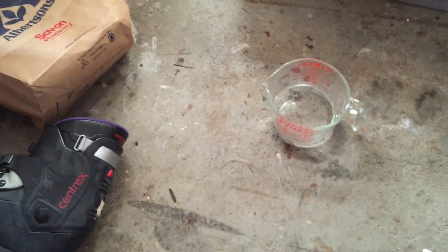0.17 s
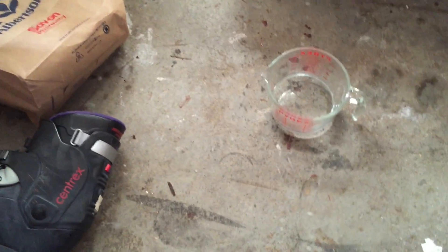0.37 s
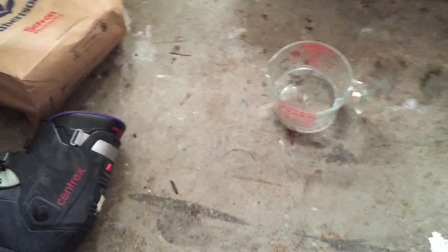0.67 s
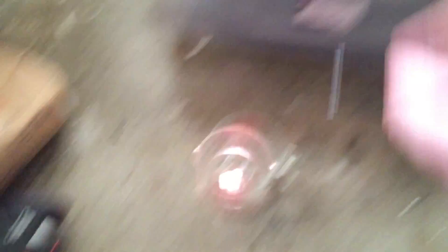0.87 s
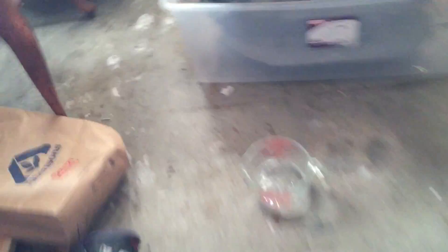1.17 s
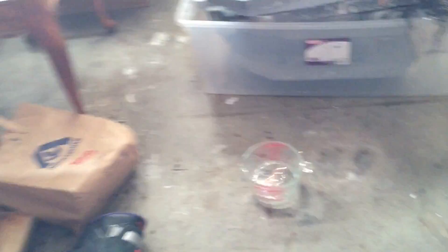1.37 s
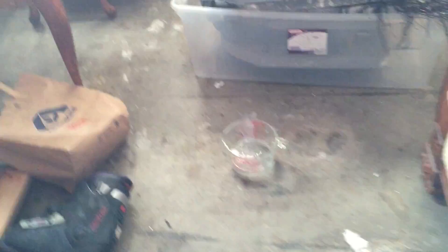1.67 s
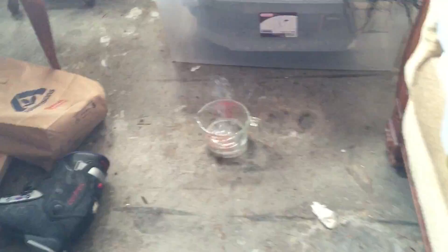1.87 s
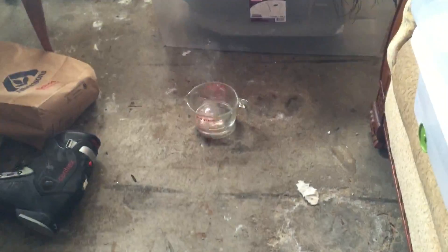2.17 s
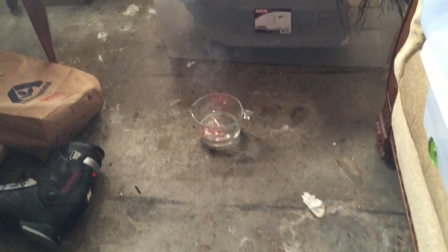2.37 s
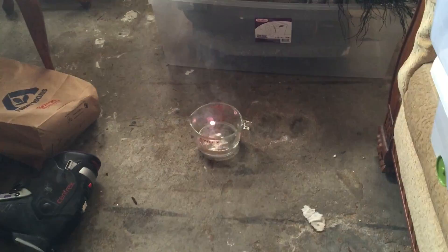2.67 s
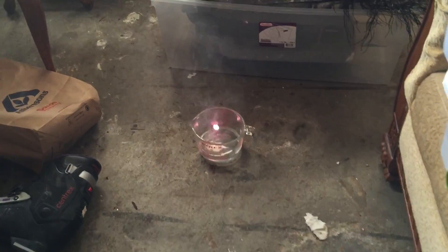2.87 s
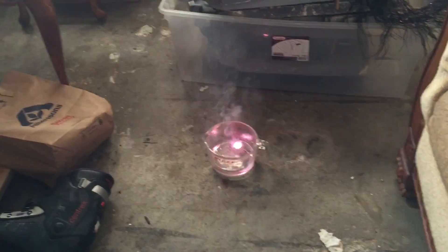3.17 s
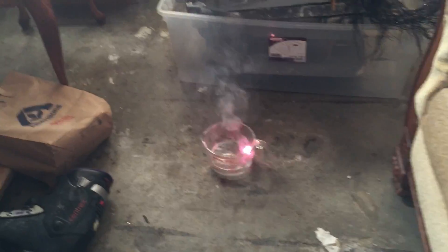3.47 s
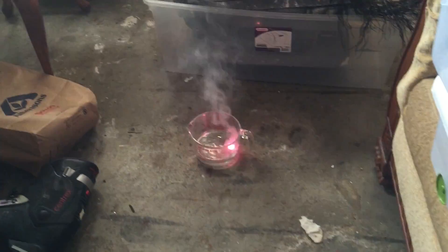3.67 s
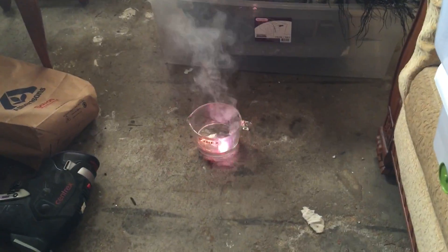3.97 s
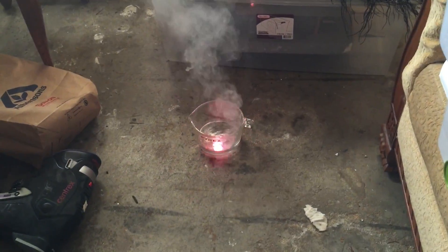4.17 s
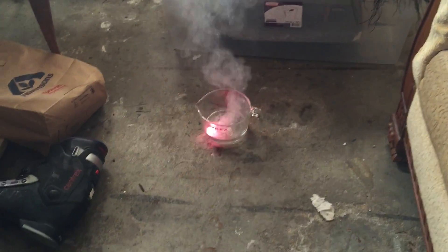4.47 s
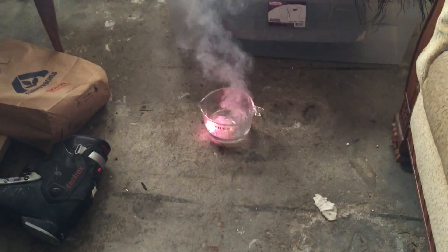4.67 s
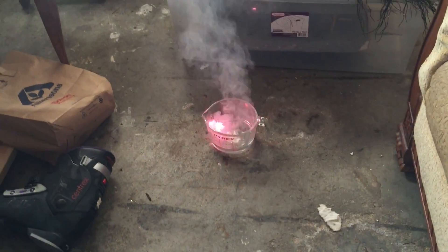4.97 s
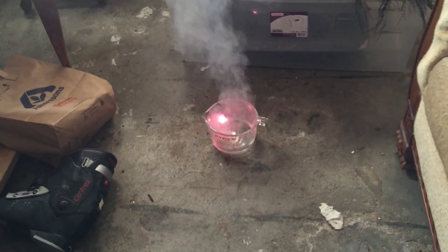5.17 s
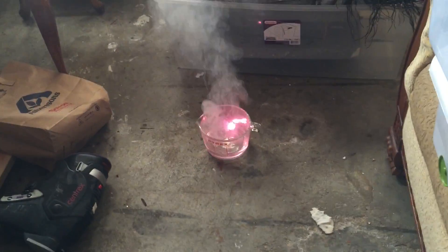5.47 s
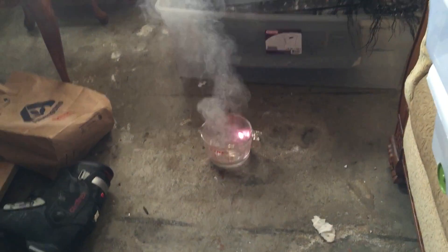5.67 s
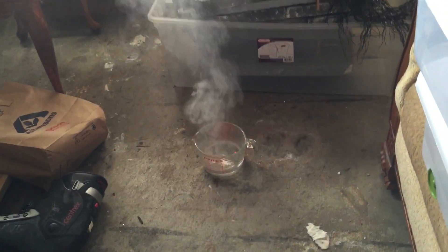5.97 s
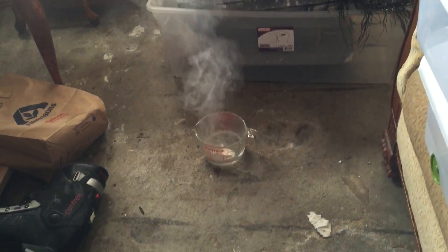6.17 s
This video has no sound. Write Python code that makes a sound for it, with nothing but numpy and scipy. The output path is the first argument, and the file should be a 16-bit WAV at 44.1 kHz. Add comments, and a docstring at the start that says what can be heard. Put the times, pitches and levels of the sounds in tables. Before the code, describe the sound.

A lump of reactive metal slaps into water in a glass cup, plops, fizzes and pops, hisses faintly, then ends in one violent blast.

```python
"""Reactive metal in a glass cup of water

A lump of reactive metal strikes water in a glass cup indoors: two filtered-noise blows with late rings,
a plop of rising pitch, pops of short noise puffs, random crackling ticks, fizz, jets of hissing gas,
and a last blast of noise and two low tones. The cup's resonances and a decaying noise tail for the room
colour them. Soles drag over concrete, cloth rustles, and an appliance hums in quiet air."""
import sys
import numpy as np
from scipy import signal
from scipy.fft import rfft, irfft, next_fast_len
from scipy.io import wavfile
from scipy.ndimage import uniform_filter1d, map_coordinates

SR = 44100
rng = np.random.default_rng(int(sys.argv[2]) if len(sys.argv) > 2 else 0)


def put_to_file(sound):
    """Save the sound as 16-bit audio at rate SR, in the file named by the first command-line argument."""
    columns = np.atleast_2d(sound).T  # one column per channel
    safe = np.clip(columns, -1, 1)
    whole_steps = np.round(safe * 32767)
    wavfile.write(sys.argv[1], SR, whole_steps.astype(np.int16))


N = 278712


def amp(db):
    """Gain of a level in dB."""
    return 10 ** (np.asarray(db) / 20)


def unit(x):
    """x at rms 1."""
    return x / np.sqrt(np.mean(x ** 2) + 1e-20)


def peak(x):
    """x at peak 1."""
    return x / np.abs(x).max()


def along(points, hz):
    """(Hz, value) points interpolated on a log frequency axis."""
    f, v = np.transpose(points)
    return np.interp(np.log(hz + 1), np.log(f + 1), v)


def curves(rows):
    """One value per sample for each column after the time; -120 outside the rows."""
    s, *cols = np.transpose(rows)
    return [np.interp(np.arange(N) / SR, s, c, -120, -120) for c in cols]


def wobble(knots_per_s):
    """A smooth random curve through normally distributed knots."""
    knots = rng.standard_normal(int(N * knots_per_s / SR) + 4)
    return map_coordinates(knots, [np.arange(N) * knots_per_s / SR])


def filtered(x, response):
    """x times a complex response of frequency."""
    m = next_fast_len(len(x) + 8192)
    return irfft(rfft(x, m) * response(np.fft.rfftfreq(m, 1 / SR)), m)[:len(x)]


def band(x, lo_hz, hi_hz):
    """Causal band-pass."""
    edges_hz = np.clip([lo_hz, hi_hz], 20, .49 * SR)
    return signal.sosfilt(signal.butter(3, edges_hz, "bandpass", fs=SR, output="sos"), x)


def rush(spectrum, patchy_db):
    """Noise of rms 1 shaped by a spectrum, with time-frequency patches of random gain."""
    z = signal.stft(rng.standard_normal(N), nperseg=256)[2]
    field = uniform_filter1d(rng.standard_normal(z.shape), 5, 0)
    field = uniform_filter1d(field, 12, 1)
    white = signal.istft(z * amp(patchy_db * unit(field)), nperseg=256)[1][:N]
    return unit(filtered(white, lambda hz: amp(along(spectrum, hz))))


def gust(start_s, length_s, db, shape):
    """Gain of a stretch of sound: a rise, a slow sag, a fall past its length."""
    rise_s, sag_db, fall_s = shape
    rise_s = min(rise_s, .4 * length_s)
    t = np.arange(N) / SR - start_s
    sagged = np.clip((t - rise_s) / (length_s - rise_s), 0, 1)
    fallen_db = 20 * np.maximum(t - length_s, 0) / fall_s
    return np.clip(t / rise_s, 0, 1) * amp(db - sag_db * sagged - fallen_db)


# Cup resonances, two of the air column, then the glass. Each row: centre in Hz, width in Hz, gain in dB.
CUP_MODES = [(881, 130, 2.5), (1204, 190, -4.5), (1805, 85, 5.5), (2710, 170, -1.5), (3550, 220, -2)]


def cup(hz, modes=CUP_MODES):
    """The cup's resonances over a broad direct path, dull above a few kHz."""
    rings = 0
    for k, (centre_hz, width_hz, db) in enumerate(modes):
        damping = 1j * hz * width_hz
        rings = rings + (-1) ** k * amp(db) * damping / (centre_hz ** 2 - hz * hz + damping)
    direct = amp(-18) * 1j * hz * 2500 / (1500 ** 2 - hz * hz + 1j * hz * 2500)
    return (rings + direct) / (1 + 1j * hz / 4200) ** 3


# Sound bouncing between water and rim: spacing of the peaks in Hz, share returned.
WATER_RIM_BOUNCE = (1810, .22)


def bounce(hz):
    """Repeated short echoes inside the cup comb the spectrum."""
    spacing_hz, share = WATER_RIM_BOUNCE
    return 1 / (1 - np.clip(share, 0, .8) * np.exp(-2j * np.pi * hz / spacing_hz))


# Room decay. Each row: frequency in Hz, t60 in seconds.
ROOM_T60 = [(100, 0.3), (700, 0.19), (2000, 0.15), (5000, .16), (12000, 0.1)]


def echo(x):
    """The room's answer: each frequency dies at its own speed; a new tail for each call."""
    hz, t, z = signal.stft(rng.standard_normal(SR // 3), SR, nperseg=256)
    decay = amp(-60 * t / along(ROOM_T60, hz)[:, None])
    tail = signal.istft(z * decay, SR, nperseg=256)[1]
    delayed = np.pad(x, (260, 0))
    return signal.fftconvolve(delayed, tail / np.linalg.norm(tail))


# Air noise spectrum. Each row: frequency in Hz, relative density in dB.
AIR_SPECTRUM = [(13, -55), (22, -27.5), (40, -14), (118, -10.5), (200, -22.5), (242, -13.5), (270, -17.5),
                (510, -28.5), (792, -28.5), (1340, -31), (1760, -31.5), (6620, -38), (16000, -44)]
AIR_RMS_DB = -66.5
# Appliance hum. Each row: frequency in Hz, mean peak level in dB.
HUM_TONES = [(118, -74), (239, -77)]


def room_tone():
    """Quiet air noise and hum tones wavering in level and phase."""
    t = np.arange(N) / SR
    hum = 0
    for hz, db in HUM_TONES:
        hum = hum + amp(db + 3.5 * wobble(8)) * np.sin(2 * np.pi * hz * t + 1.5 * wobble(5.3))
    return amp(AIR_RMS_DB + .8 * wobble(3.8)) * rush(AIR_SPECTRUM, patchy_db=1.0) + hum


# Gas hiss spectrum. Each row: frequency in Hz, relative density in dB.
HISS_SPECTRUM = [(880, -27), (1500, -11), (1830, 0), (2510, -11), (3410, -1.5), (4830, -9), (7170, -7),
                 (10500, -12), (13800, -6), (16000, -13.5)]
# Gas jets. Each row: start in seconds, length in seconds, level in dB ahead of the cup, emphasis in Hz.
GAS_JETS = [(.788, .027, -38, 3800), (3.895, .04, -59, 7500), (3.95, .045, -43.5, 9500),
            (3.99, .14, -41, 5800), (4.266, .03, -58, 13000), (4.392, .052, -39.5, 8800),
            (4.46, .07, -54, 6430), (4.613, .067, -58, 10100), (4.69, .048, -44.5, 7500),
            (4.742, .105, -43.5, 7300), (4.848, .06, -44.5, 8800), (6.266, .003, -53, 10500)]
# Rise in seconds (at most 40% of the length), sag over the rest in dB, fall in seconds per 20 dB.
JET_ENVELOPE = (.024, 6.5, .022)


def jets():
    """Burning gas escapes in fluttering jets, each with its own broad emphasis."""
    gas = amp(1.4 * wobble(70) + 1.4 * wobble(300)) * rush(HISS_SPECTRUM, patchy_db=2.5)
    out = np.zeros(N)
    for start_s, length_s, db, centre_hz in GAS_JETS:
        tone = unit(filtered(gas, lambda hz: 1 / (1 + .42 * np.log2((hz + 1) / centre_hz) ** 2)))
        out += gust(start_s, length_s, db, JET_ENVELOPE) * tone
    return amp(-1.5) * filtered(out, bounce) + amp(-1.1) * filtered(out, cup)


# The lump striking the water, then the first flash. Each row: start in seconds, slap level in dB,
# slap t60 in seconds, tail level in dB relative to the slap, tail t60 in seconds.
BIG_BLOWS = [(.8128, -11, 0.028, -17, .22), (.9875, -9.5, 0.049, -17, .2)]
# Spectra of the strike and of the flash. Each row: frequency in Hz, relative density in dB.
STRIKE_SPECTRUM = [(240, -30), (480, -19), (800, -4), (1250, -7.5), (1800, -19), (2300, -16), (3150, -9.5),
                   (3600, -18), (4600, -9), (5900, -13), (6400, -28.5), (16000, -38)]
FLASH_SPECTRUM = [(240, -14), (330, -8), (500, -20), (840, -3), (1300, -10), (1840, -9), (2200, -16),
                  (3000, -14), (3600, -24), (4400, -23), (5200, -30), (16000, -44)]
# One list of rings per blow. Each row: delay in seconds, frequency in Hz, peak level in dB, t60 in seconds.
SLOSH_RINGS = [
    [(.001, 815, -20, .04), (.004, 175, -15, .07), (.002, 2300, -28, .08), (.002, 3150, -22, .07)],
    [(.001, 840, -14.5, .07), (.006, 190, -10, .035), (.005, 300, -16, .04), (.02, 245, -24, 0.11),
     (.036, 80, -21, .14), (.04, 125, -28, .1)],
]


def blows():
    """A slap of water with a splashing tail; the cup rings and the water sloshes back a moment later."""
    out, t = np.zeros(N + SR), np.arange(SR // 3) / SR
    spectra = (STRIKE_SPECTRUM, FLASH_SPECTRUM)
    for (start_s, db, t60_s, tail_db, tail_t60_s), spectrum, rings in zip(BIG_BLOWS, spectra, SLOSH_RINGS):
        decay = amp(-60 * t / t60_s) + amp(tail_db - 60 * t / tail_t60_s)
        splash = rush(spectrum, patchy_db=1.1)[:len(t)] * decay
        dry = amp(db) * splash * (1 - np.exp(-t / .0015))
        for delay_s, hz, ring_db, ring_t60_s in rings:
            late = np.maximum(t - delay_s, 0)
            dry += amp(ring_db - 60 * late / ring_t60_s) * np.sin(2 * np.pi * hz * late)
        wet = amp(-12.5) * echo(dry)
        first = round(start_s * SR)
        out[first:][:len(dry)] += dry
        out[first:][:len(wet)] += wet
    return out[:N]


# The cavity closing. Each row: time in seconds, mean pitch in Hz, mean rms level in dB.
PLOP_TRACK = [(.912, 620, -56), (.928, 740, -35), (.939, 900, -22), (.95, 1147, -33.5), (.962, 1450, -44),
              (.972, 1600, -63)]


def plop():
    """The air cavity behind the lump shrinks, so its note rises; its walls shiver."""
    hz, db = curves(PLOP_TRACK)
    pitch_hz = np.maximum(hz, 0) * (1 + .04 * wobble(150))
    tone = np.sin(2 * np.pi * np.cumsum(pitch_hz) / SR)
    return np.sqrt(2) * amp(db + 2.5 * wobble(120)) * tone


# How hard the lump reacts. Each row: time in seconds, crackling level in dB.
REACTION_LEVEL = [(.94, -80), (.985, -51), (1.2, -49.5), (1.42, -55), (1.54, -64), (1.848, -68),
                  (1.92, -77), (2.5, -70), (2.64, -75), (3.0, -78), (3.17, -66), (3.3, -68), (3.48, -67),
                  (3.6, -76), (3.87, -77), (4.0, -61), (4.15, -70), (4.3, -65), (4.56, -67), (4.91, -66),
                  (4.96, -71), (5.24, -73), (5.45, -69), (5.7, -79), (6.3, -87)]
# Fizz spectrum. Each row: frequency in Hz, relative density in dB.
FIZZ_SPECTRUM = [(880, -45), (1500, -14), (1790, -5), (2300, -15), (3660, -9), (4000, -15.5), (4550, -15.5),
                 (16000, -23.5)]
TICKS_PER_S, CLUMPS_DB = 140, 3  # mean rate; swing of the level from clump to clump
FIZZ_START_DB, FIZZ_SAG_DB_PER_S = 2.4, 2.9  # relative to the crackling, sagging from time 0


def reaction():
    """Tiny pockets crackle in the cup over a fine fizz that thins out as the lump shrinks."""
    (level_db,) = curves(REACTION_LEVEL)
    sizes = amp(np.minimum(4 * rng.exponential(size=N), 11))
    ticks = (rng.random(N) < TICKS_PER_S / SR) * sizes * rng.choice([-1, 1], N)
    grains = unit(ticks) + 0.15 * rng.standard_normal(N)
    sputter = unit(amp(CLUMPS_DB * wobble(14)) * filtered(grains, cup))
    fizz = amp(2.5 * wobble(40) + 2.5 * wobble(400)) * rush(FIZZ_SPECTRUM, patchy_db=2.5)
    fizz_db = FIZZ_START_DB - FIZZ_SAG_DB_PER_S * np.arange(N) / SR
    return amp(level_db) * (sputter + amp(fizz_db) * fizz)


# Floor rumble under the soles. Each row: frequency in Hz, relative density in dB.
SOLE_SPECTRUM = [(15, -36), (25, -3), (54, 1), (128, -7), (196, 1), (413, -13.5), (600, -22.5), (780, -52),
                 (1320, -120)]
# Scrape resonances. Each row: centre in Hz, width in Hz, relative gain in dB.
SCRAPE_BANDS = [(950, 250, -3), (1600, 280, -2.5), (2200, 280, -1.5), (2750, 300, 0), (4300, 600, -11)]
# Soles dragged over concrete. Each row: start in seconds, length in seconds, rumble in dB, scrape in dB.
SOLE_DRAGS = [(1.085, .17, -52, -66), (1.265, .08, -49, -66), (1.365, .1, -50, -66),
              (2.372, .11, -47, -57.5)]
# Cloth spectrum. Each row: frequency in Hz, relative density in dB.
CLOTH_SPECTRUM = [(3500, -40), (5600, -3), (7500, -14), (11400, -7), (13800, 0), (16000, -15)]
# Cloth rustles. Each row: start in seconds, length in seconds, level in dB.
CLOTH_RUSTLES = [(2.06, .17, -67), (2.38, .08, -62)]
# Both: rise in seconds (at most 40% of the length), sag in dB, fall in seconds per 20 dB.
DRAG_ENVELOPE = (.013, 4, .028)
RUSTLE_ENVELOPE = (.04, 1.5, .03)


def scrape_response(hz):
    """Sum of the resonant humps of a sole scraping concrete."""
    return sum(amp(db) / (1 + (2 * (hz - centre_hz) / width_hz) ** 2)
               for centre_hz, width_hz, db in SCRAPE_BANDS)


def steps():
    """Soles drag over the concrete, shake the floor and scrape; cloth rustles."""
    rumble = amp(2.5 * wobble(30)) * rush(SOLE_SPECTRUM, patchy_db=3.5)
    grit = amp(3 * wobble(120))
    scrape = grit * unit(filtered(rng.standard_normal(N), scrape_response))
    drags = np.zeros(N)
    for start_s, length_s, rumble_db, scrape_db in SOLE_DRAGS:
        mix = rumble + amp(scrape_db - rumble_db) * scrape
        drags += gust(start_s, length_s, rumble_db, DRAG_ENVELOPE) * mix
    rustling = sum(gust(*row, RUSTLE_ENVELOPE) for row in CLOTH_RUSTLES)
    return drags + grit * rush(CLOTH_SPECTRUM, patchy_db=2.1) * rustling


def puff(t, t60_s, rise_s):
    """A noise burst of escaping gas: quick rise, exponential decay."""
    return rng.standard_normal(len(t)) * amp(-60 * t / t60_s) * (1 - np.exp(-t / rise_s))


THUMP_DB = -7.5  # peak of the push on the water, relative to the air part
GLASS_TRIM_DB, CRACK_TRIM_DB, SPRAY_TRIM_DB = 2.5, 1.5, 3.5  # added to the columns of every pop


def pop(db, glass_db, crack_db, spray_db):
    """One gas pocket bursting: a puff of a few ms rings the cup, pushes the water and throws spray."""
    t = np.arange(SR // 10) / SR
    t60_s = .009 * amp(0.21 * (db + 33))  # bigger pockets empty more slowly
    push_hz = 205 * amp(rng.normal(0, 1.47))
    push = np.sin(2 * np.pi * push_hz * t) * amp(-60 * t / 0.033) * (1 - np.exp(-t / 0.0023))
    air = filtered(puff(t, t60_s, 0.00065), lambda hz: cup(hz, CUP_MODES[:2]) / (1 + 1j * hz / 2200))
    glass = filtered(puff(t, t60_s, 0.00076), lambda hz: cup(hz, CUP_MODES[2:]))
    crack = band(puff(t, t60_s, 0.00045), 2600, 4500)
    spray = filtered(band(puff(t, .014, .0015), 6800, 15500), bounce)
    parts = peak(air) + amp(THUMP_DB) * peak(push)
    parts += amp(glass_db + GLASS_TRIM_DB) * peak(glass)
    parts += amp(crack_db + CRACK_TRIM_DB) * peak(crack)
    parts += amp(spray_db + SPRAY_TRIM_DB) * peak(spray)
    return amp(db) * parts


# Pops in the cup. Each row: start in seconds, peak of the air part in dB, then glass ring, crack and spray
# in dB relative to it, ahead of their trims.
GAS_POPS = [(1.112, -43, 3.5, -5, -4), (1.154, -32.5, -8, -3, -25), (1.194, -33, -4, -4, -13),
            (1.219, -44.5, -2, 1, -3), (1.262, -40, -7, -15, -14), (1.284, -43, 4.5, -2, -6),
            (1.318, -39, -7, -10, -15), (1.352, -41, -6, -2, -11), (1.378, -33, -7, -14, -25),
            (1.397, -40.5, -2, -8, -15), (1.441, -39, -3, -24, -19), (1.64, -48, -8, -10, -12),
            (1.657, -39, -3.5, -25, -22), (1.779, -35.5, -13, -30, -26), (1.949, -59.5, -12, -1, 5),
            (2.162, -45.5, -10, -17, -22), (2.204, -47, -4, 4, -16), (2.223, -27, -18, -19, -31),
            (2.518, -23, -2, -4, -22), (2.679, -46.5, -6, -13, -22), (2.688, -62, -4, -6, 8),
            (2.717, -58, 0, -5, 6), (2.773, -29, 1, 1, -19), (3.033, -55.5, -10, -10, -17),
            (3.08, -56.5, 3, -1, -14), (3.118, -51.5, 2, -4, -16), (3.217, -48, 2, -5.5, -10),
            (3.322, -60, 1, -4, -15), (3.397, -48.5, -16, -10, -30), (3.69, -37.5, -3, -3, -19),
            (3.902, -53, -15, -21, -3), (3.926, -48, -8, -13, 1.5), (4.209, -60, 5, -12, -11),
            (4.238, -57, -5, -7, -3), (4.288, -54, -11, -8, -2), (4.379, -56.5, 3, -2, -2),
            (4.475, -56, 4, 4, 13), (4.513, -53, 0, 5, 16), (4.612, -49.5, 0, -3, -3),
            (4.659, -51.5, -4, 0, -1), (4.693, -47.5, -1, 1, 2), (4.84, -44, 6, -3, -8),
            (4.919, -45, -15, -14, -16), (5.283, -51.5, 3.5, -12, -21), (5.337, -54, -3, -3, -14),
            (5.349, -58, 0, 0, -10), (5.371, -56, 0, 5, -10), (5.382, -49, -4, 4, -13),
            (5.449, -53, -4, 0, -14), (5.472, -53, 0, 0, -14), (5.553, -54, -5, 0.5, -26),
            (5.565, -50.5, 4, 4, -11), (5.749, -61, -5, -10, -16)]


def pops():
    """Gas pockets burst one by one, each with the room behind it."""
    out = np.zeros(N + SR)
    for start_s, *levels_db in GAS_POPS:
        dry = pop(*levels_db)
        wet = amp(-6.5) * echo(dry)
        first = round(start_s * SR)
        out[first:][:len(dry)] += dry
        out[first:][:len(wet)] += wet
    return out[:N]


# The last burst: start in seconds, noise level in dB at the onset of its decay, t60 in seconds.
LAST_BURST = (6.3141, 0.46, 0.019)
# Blast spectrum. Each row: frequency in Hz, relative density in dB.
BLAST_SPECTRUM = [(88, -55), (150, -21), (480, -18), (998, -2.5), (2360, -10.5), (3350, -4), (5460, -12.5),
                  (9080, -4), (14000, -14), (16000, -16)]


def burst():
    """The lump blows apart: a dense broadband blast that booms in the cup."""
    start_s, db, t60_s = LAST_BURST
    t = np.maximum(np.arange(N) / SR - start_s, 0)
    boom = amp(-16) * np.sin(2 * np.pi * 220 * t) + amp(-8) * np.sin(2 * np.pi * 850 * t)
    envelope = amp(db - 60 * t / t60_s) * (1 - np.exp(-t / 0.00029))
    return (rush(BLAST_SPECTRUM, patchy_db=2.5) + boom) * envelope


def scene():
    """All sources at one microphone."""
    in_cup = jets() + plop() + reaction() + burst()
    reverberant = in_cup + amp(-9) * echo(in_cup)[:N]
    return (room_tone() + reverberant + blows() + steps() + pops())[None]


TOP_HZ = 15900


def record(dry):
    """The microphone drops deep bass, the input saturates at full scale, a steep low-pass limits the band."""
    thin = signal.sosfilt(signal.butter(3, 42, "highpass", fs=SR, output="sos"), dry[0])
    clipped = thin / (1 + np.abs(thin) ** 8) ** (1 / 8)
    return signal.sosfilt(signal.ellip(14, .5, 90, TOP_HZ, fs=SR, output="sos"), clipped)[None]


dry = scene()
out = record(dry)
put_to_file(out)
```